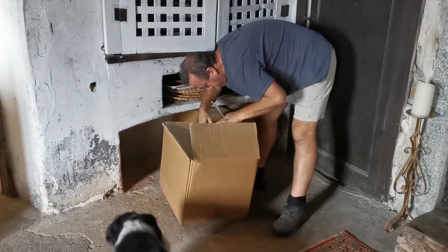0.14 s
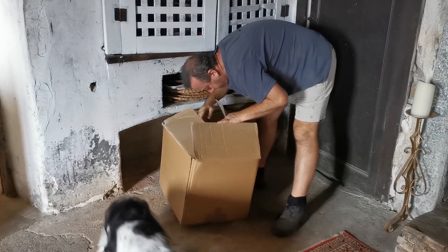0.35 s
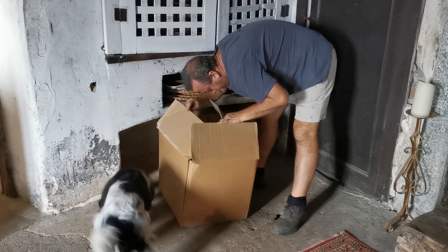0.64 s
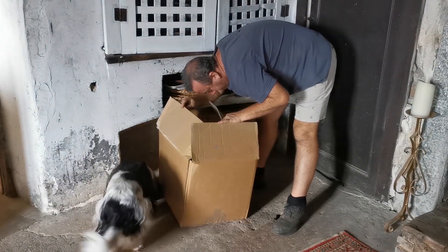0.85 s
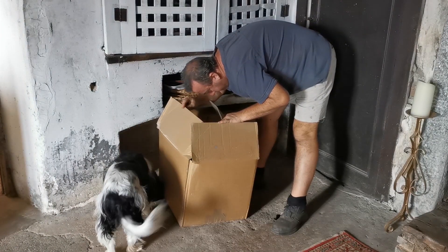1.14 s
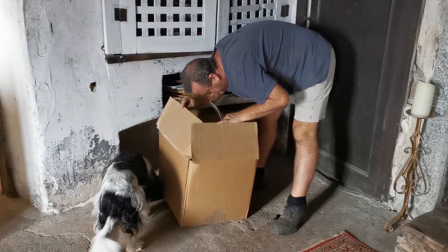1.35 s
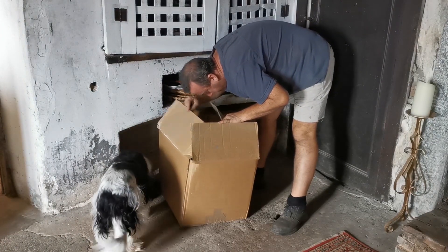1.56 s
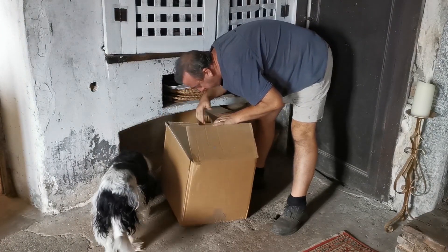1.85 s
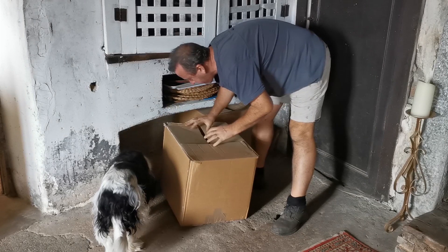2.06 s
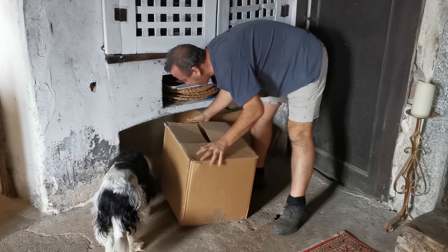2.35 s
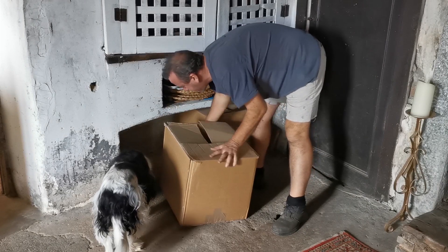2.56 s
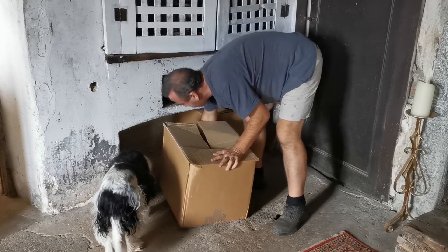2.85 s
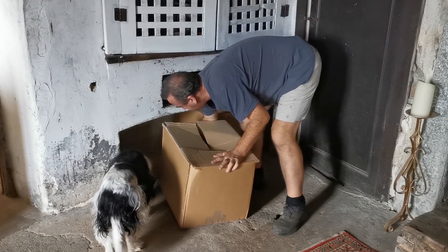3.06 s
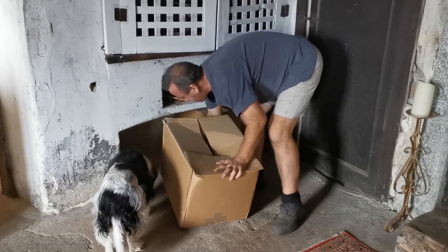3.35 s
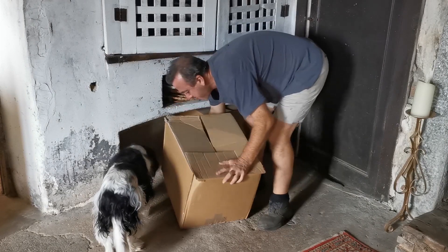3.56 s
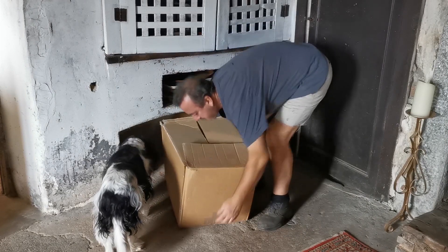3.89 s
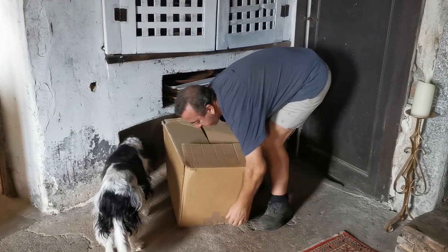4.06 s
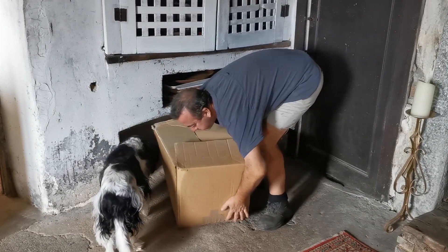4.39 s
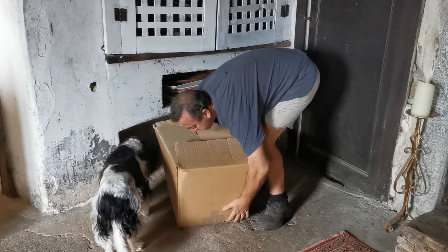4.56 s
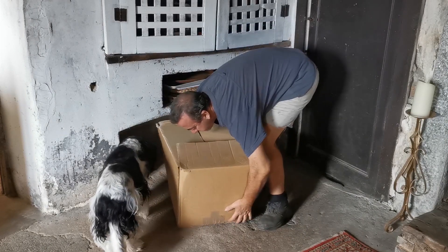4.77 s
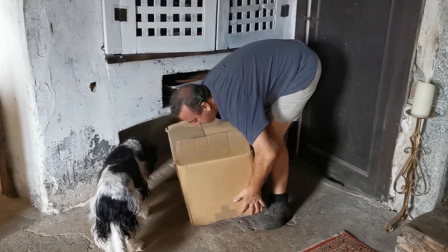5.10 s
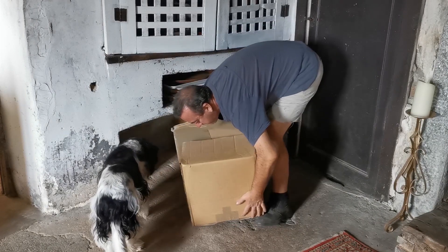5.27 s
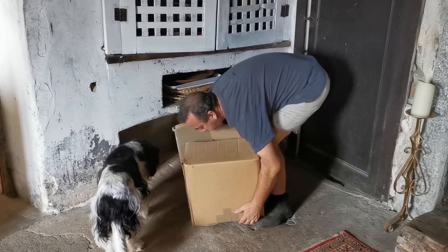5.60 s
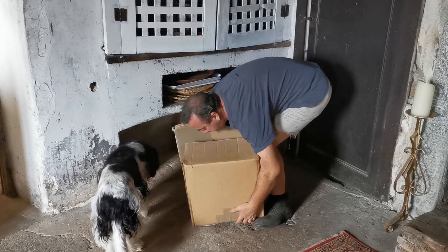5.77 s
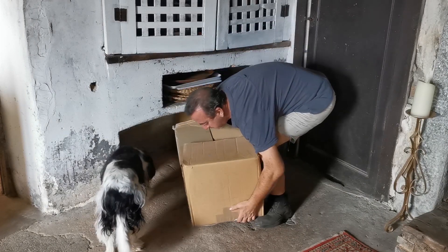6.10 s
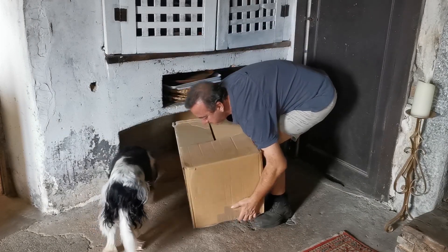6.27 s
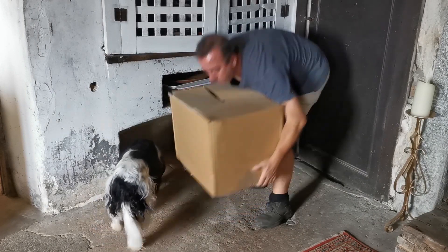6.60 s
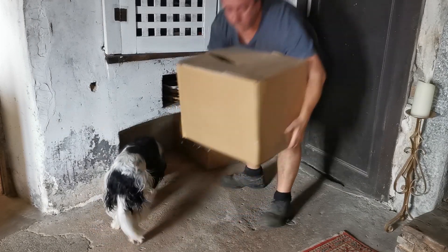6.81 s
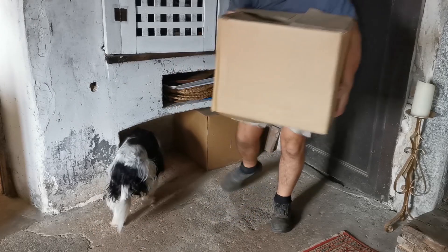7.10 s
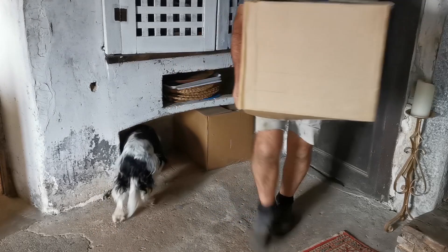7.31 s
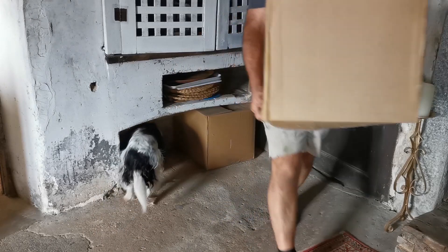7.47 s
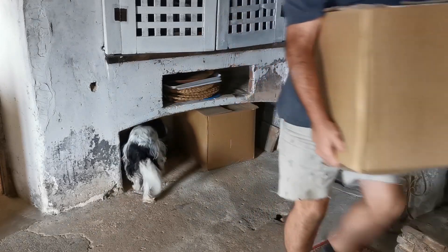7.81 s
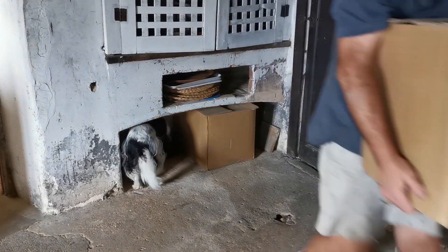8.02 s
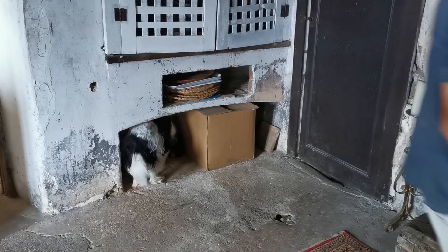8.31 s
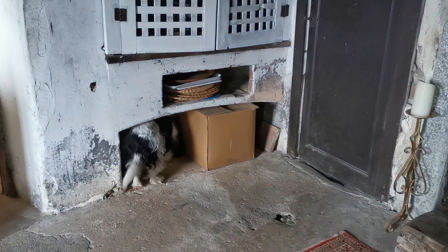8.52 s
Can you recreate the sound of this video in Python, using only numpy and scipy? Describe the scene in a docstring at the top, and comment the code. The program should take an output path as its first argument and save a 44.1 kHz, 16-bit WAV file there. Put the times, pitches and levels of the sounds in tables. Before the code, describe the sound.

Dry cardboard scraping and hollow box knocks, a loud scuffing crack midway, then softer rustles and footfalls in a reverberant stone-walled room.

```python
"""A man folds shut a large cardboard box in a small stone-walled room, drags it over the concrete, lifts it and carries it past.
Sliding card rasps in tiny random slips that shake the panels into drumming, and loose edges skid in bursts of noise.
Knocks and footfalls ring the modes of the box, creases and bumps give short cracks, the flaps pump slow swings of air.
Something small and metallic jingles early on, as brief high modes. A low rumble of shaped noise lies under it all."""
import sys
import numpy as np
from scipy import signal
from scipy.fft import rfft, irfft, next_fast_len
from scipy.io import wavfile
from scipy.ndimage import map_coordinates

SR = 44100
rng = np.random.default_rng(int(sys.argv[2]) if len(sys.argv) > 2 else 0)


def transcribe(signal):
    """Save signal, clipped to [-1, 1], as a 16-bit WAV file at the path in sys.argv[1]."""
    frames = np.atleast_2d(signal).T
    limited = np.clip(frames, -1, 1)
    pcm = np.round(limited * 32767).astype(np.int16)
    wavfile.write(sys.argv[1], SR, pcm)


N = 381460
TIME = np.arange(N) / SR
TAIL = 24576  # samples kept of every single event and of the room
CUTOFF_HZ = 15700  # top of the microphones' range

# ringing modes of the box: pitch_hz, level_db (relative), t60_s
BOX_MODES = [(74.3, -2.5, 0.2), (127, 3, 0.081), (149.4, 2, 0.13), (165, 0, 0.15), (195.3, -2, 0.15),
             (228.4, -1, 0.12), (269.2, 0, 0.097), (316, 0, 0.11), (347, 3, 0.054), (408.6, -1, 0.041),
             (538, -10, 0.11), (639, 2, 0.046), (730, -4, 0.05), (960, -16, 0.035)]


def from_db(db):
    """Decibels to gain."""
    return 10 ** (np.asarray(db) / 20)


def rms_one(x):
    """Scale to an rms of 1."""
    return x / np.sqrt(np.mean(x ** 2) + 1e-20)


def in_time(rows):
    """Columns of a curve at every sample."""
    s, *columns = np.transpose(rows)
    return [np.interp(TIME, s, column) for column in columns]


def per_bin(points, size):
    """A table over log frequency, read at every bin of a transform."""
    hz, value = np.transpose(points)
    bins_hz = np.fft.rfftfreq(size, 1 / SR) + 1
    return np.interp(np.log(bins_hz), np.log(hz), value)


def coloured(x, spectrum):
    """Filter a steady sound by a spectrum that falls away outside its ends; rms 1."""
    size = next_fast_len(N)
    below, above = (spectrum[0][0] / 2, -70), (spectrum[-1][0] * 2, -90)
    gain = from_db(per_bin([below, *spectrum, above], size))
    return rms_one(irfft(rfft(x, size) * gain, size)[..., :N])


def drift(rate):
    """Slow chance with an rms of 1: straight lines between random knots, rate of them a second."""
    knots = np.arange(0, TIME[-1] + 1, 1 / rate)
    return rms_one(np.interp(TIME, knots, rng.standard_normal(len(knots))))


def ring(force, hz, t60):
    """A damped mode: a unit click sets a sine of height 1 ringing, 60 dB down after t60 seconds."""
    decay, w = from_db(-60 / (t60 * SR)), 2 * np.pi * hz / SR
    return signal.lfilter([0, np.sin(w)], [1, -2 * decay * np.cos(w), decay * decay], force + 1e-18)


def resonance(x, hz, width_hz):
    """A band-pass with gain 1 on top."""
    return signal.lfilter(*signal.iirpeak(hz, hz / width_hz, fs=SR), x)


def band(x, hz, breadth, order):
    """Keep what lies within a factor of breadth around hz."""
    edges = [hz / breadth, min(hz * breadth, CUTOFF_HZ)]
    return signal.sosfilt(signal.butter(order, edges, "band", fs=SR, output="sos"), x)


def diffuse(size):
    """Spectrum of sound from all sides: the two microphones agree most in the bass."""
    # left-right likeness of the sound: frequency_hz, correlation (0 to 1)
    likeness = [(60, 0.75), (200, 0.88), (500, 0.66), (1000, 0.2), (4000, 0.0085)]
    mid, side = rfft(rng.standard_normal((2, size)))
    alike = np.clip(per_bin(likeness, size), 0, .999)
    return np.sqrt(1 + alike) * mid + np.sqrt(1 - alike) * side * [[1], [-1]]


def room(x, wet_db, gap=0.0017):
    """Direct sound, then dense reflections off the stone that die soonest in the treble; new at every call."""
    # decay of the stone room: frequency_hz, t60_s
    decay_times = [(120, 0.46), (4000, 0.56), (12000, 0.28)]
    t, field, tail = np.arange(TAIL) / SR, diffuse(TAIL), 0
    for hz, t60 in decay_times:
        # bands overlap: each is full at its own frequency and gone at its neighbours'
        share = per_bin([(f, f == hz) for f, _ in decay_times], TAIL)
        tail = tail + irfft(field * share) * from_db(-60 * t / t60)
    fading_in = np.minimum(t / gap, 1)  # over gap seconds
    response = from_db(wet_db) * rms_one(tail * fading_in) / np.sqrt(TAIL)
    response[:, 0] += 1  # direct sound
    return signal.fftconvolve(x[None], response, axes=1)[:, :len(x)]


def add(out, s, peak_db, sound, crest_db):
    """Lay in a sound: the rms of its first 40 ms is set crest_db below its nominal peak."""
    start, head = int(s * SR), sound[:, :SR // 25]
    gain = from_db(peak_db - crest_db) / np.sqrt(np.mean(head ** 2))
    out[:, start:start + TAIL] += gain * sound[:, :N - start]


def slips(per_s, spread_db):
    """Card catches and lets go in tiny random slips: clicks of unequal size and either sign."""
    sizes = from_db(spread_db * np.minimum(rng.exponential(1, N), 5))
    return sizes * rng.choice([-1, 1], N) * (rng.random(N) < per_s / SR)


def crack(hz, length=0.002, tearing=0.26, splinter_db=-9):
    """One sharp crack and a little tearing noise: a band of the card plus a broader, gentler one."""
    t = np.arange(TAIL) / SR
    force = signal.unit_impulse(TAIL) + tearing * rng.standard_normal(TAIL) * np.exp(-t / length)
    body = band(force, hz, breadth=1.46, order=2)
    splinter = band(force, hz, breadth=1.85, order=1)
    return body + from_db(splinter_db) * splinter


def room_rumble(level_db=-61, left_right_db=0.9):
    """Steady noise from all sides, heaviest in the bass and slightly louder on the left."""
    # colour of the rumble: frequency_hz, gain_db (relative)
    rumble_colour = [(20, 7.5), (30, -26), (50, -8.5), (90, -10.5), (200, -14), (370, -22), (1100, -33.5),
                     (7000, -47), (10500, -58), (15000, -67)]
    noise = irfft(diffuse(2 * next_fast_len(N // 2 + 1)))[:, :N]
    rumble = from_db(level_db) * coloured(noise, rumble_colour)
    return rumble * from_db([[left_right_db], [-left_right_db]])


def chinks():
    """Metal touches metal: each touch is a click that briefly rings its high modes."""
    # touches of metal: start_s, peak_db (nominal, at the box)
    touches = [(0.2194, -57), (0.517, -48), (0.7444, -37), (0.7644, -55), (1.0869, -51), (1.3512, -51)]
    # modes of the metal: pitch_hz, level_db (relative), t60_s
    metal_modes = [(5700, -1, .03), (7700, 4.5, 0.0076), (9780, -12, .06), (10740, 0, .03),
                   (10930, -4, 0.041), (14020, 2, .03), (14400, -1, .04)]
    out, touch = np.zeros((2, N)), signal.unit_impulse(TAIL)
    for s, peak_db in touches:
        metal = sum(from_db(db + rng.normal(0, 2.9)) * ring(touch, hz, t60) for hz, db, t60 in metal_modes)
        add(out, s, peak_db, room(metal + 5 * touch, wet_db=8), crest_db=15.0)
    return out


def puffs(swell=0.012):
    """The air in the box swings for a few slow cycles when a wall is pressed."""
    # air pushed out by flexing walls: start_s, peak_db (nominal, at the box), pitch_hz
    presses = [(2.275, -39, 72), (2.488, -43, 62.4), (2.721, -39, 99), (3.051, -47, 52.5),
               (3.891, -45.5, 49), (4.348, -40, 61), (5.559, -41, 62), (5.894, -41.5, 59.7),
               (6.413, -46.5, 47.4), (7.744, -51, 71), (8.459, -53.5, 40.8)]
    out, t = np.zeros((2, N)), np.arange(TAIL) / SR
    for s, peak_db, hz in presses:
        air = t * np.exp(-t / swell) * np.sin(2 * np.pi * hz * t)
        add(out, s, peak_db, room(air, wet_db=-1.0), crest_db=3.5)
    return out


def short_cracks():
    """A crease, a flap's clap, a footfall or a bump gives a single short crack in the room."""
    # short cracks: start_s, peak_db (nominal, at the box), centre_hz, room_db (reflections)
    crack_table = [(3.505, -42, 2250, -6), (3.552, -42, 7200, -10), (3.992, -37.5, 1970, -7),
                   (3.998, -34.5, 2330, 3), (4.171, -42.5, 7860, -6), (4.225, -38, 1940, 1),
                   (4.287, -43.5, 7700, 4), (5.409, -31, 2540, 4), (5.413, -24.5, 1160, -1),
                   (5.437, -31.5, 2940, 2), (6.393, -35.5, 710, 1), (6.706, -52, 2560, 3),
                   (6.816, -60, 7000, 3), (6.844, -57, 1280, -9), (7.263, -28, 880, 1),
                   (7.265, -36, 2100, 0), (7.769, -34, 815, 3)]
    out = np.zeros((2, N))
    for s, peak_db, hz, room_db in crack_table:
        add(out, s, peak_db, room(crack(hz), room_db), crest_db=16.5)
    return out


def knocks_and_footfalls(focus_db=13, scatter_db=1.56):
    """A soft blow gives a slap and rings the box, most near one panel's pitch; it rebounds once."""
    # knocks on the box and footfalls: start_s, peak_db (nominal, at the box), panel_hz, slap_db (relative to peak_db)
    blows = [(0.494, -38.5, 190, -12), (1.316, -50, 235, -4), (1.86, -41, 174, -4), (1.909, -44, 340, -19),
             (2.016, -39.5, 233, 7.5), (2.159, -42.5, 180, 8), (2.262, -27, 229, -5),
             (2.284, -23, 150.7, -12), (2.49, -44, 162, -13), (2.727, -35.5, 126.4, 3),
             (4.348, -28.5, 230, -3), (4.582, -39.5, 182, -12), (5.067, -25, 219.6, -26),
             (5.203, -33, 160, -3), (5.588, -40.5, 132, 2.5), (6.088, -32.5, 149.3, -0.5),
             (7.263, -39.5, 393, 7), (7.768, -36.5, 202, 7), (8.335, -39.5, 274, 2.5)]
    contact_s = 0.00048  # time constant of the push
    rebound_cycles, rebound_spread, rebound_db = 2.997, 0.046, -4.5  # cycles of the panel, fraction, dB
    slap_hz, slap_room_db = 570, 7.5
    out, t = np.zeros((2, N)), np.arange(TAIL) / SR
    force = np.diff(t * np.exp(-t / contact_s), prepend=0)  # what radiates is the change of a short push
    for s, peak_db, panel_hz, slap_db in blows:
        box = 0
        for k, (hz, db, t60) in enumerate(BOX_MODES):
            octaves_away = abs(np.log2(hz / panel_hz))
            strength_db = db - focus_db * octaves_away + scatter_db * rng.normal()
            # modes start in opposed pairs, so the boom swells over its first cycles
            box = box + (-1) ** (k // 2) * from_db(strength_db) * ring(force, hz, t60)
        rebound = rebound_cycles / panel_hz * (1 + rebound_spread * rng.uniform(-1.24, 1))
        for delay, loss_db in [(0, 0), (rebound, rebound_db)]:
            add(out, s + delay, peak_db + loss_db, room(box, wet_db=-2.5), crest_db=11.5)
        add(out, s, peak_db + slap_db, room(crack(slap_hz), slap_room_db), crest_db=20.5)
    return out


def scuffs(skid_s=0.044, low_hz=560, top_hz=11000, tail_db=-7, tail_t60=0.27):
    """An edge jerks free and skids: a band of dense noise starts at once, fades fast, then dies in a room tail."""
    # skids of an edge: start_s, peak_db (nominal, at the box), centre_hz
    skids = [(1.8664, -28, 8030), (1.9, -24, 7900), (2.157, -34, 1050), (2.475, -35, 1304),
             (4.201, -32, 1900), (5.4105, -14.5, 2360), (5.4219, -16.5, 2600), (6.257, -28.5, 2980),
             (7.108, -39.5, 1780), (8.346, -46, 1700), (8.45, -44, 9000)]
    out, t = np.zeros((2, N)), np.arange(TAIL) / SR
    limits = signal.butter(2, [low_hz, min(top_hz, CUTOFF_HZ)], "band", fs=SR, output="sos")
    for s, peak_db, hz in skids:
        fading = np.hypot(np.exp(-t / skid_s), from_db(tail_db - 60 * t / tail_t60))
        burst = band(irfft(diffuse(TAIL)) * fading, hz, breadth=1.18, order=1)
        add(out, s, peak_db, signal.sosfilt(limits, burst), crest_db=24.0)
    return out


def stroke_levels():
    """Each stroke takes hold, swells to a crest, slackens and dies away; overlapping strokes add in power."""
    # strokes of card sliding over card, hands or floor: start_s, rise_s (speeding up), fall_s (slowing down),
    # rasp_db (at the crest), then relative to the rasp: hiss_db (fibres), chatter_db (flaps), drumming_db (walls);
    # all levels before the trims of each layer
    strokes = [(0, 0.0033, 0.051, -51.5, -7.5, 1, -7), (.11, 0.062, 0.041, -51.5, -8, -4, -2.5),
               (.313, 0.061, 0.048, -56.5, -3.5, -0.5, -2), (.507, 0.074, 0.073, -56.5, -1.5, 2.5, 2),
               (.653, 0.1, 0.19, -51.5, -1, -6, -10), (.956, 0.08, 0.095, -58, -3, -2.5, 1),
               (1.874, 0.055, 0.039, -45.5, 1.5, -6.5, 2), (2.165, 0.015, 0.045, -59, 5, 3.5, 0),
               (2.255, 0.015, 0.051, -60.5, -2, -4, 20.5), (2.357, .02, 0.065, -59, 4.5, -4.5, 6),
               (2.48, 0.014, .14, -58, 6, -10, -13), (2.732, 0.053, 0.13, -54, 3, -2, -0.5),
               (3.001, 0.18, 0.086, -54, -2, -1, 0), (3.383, 0.13, 0.12, -51.5, -6.5, -3, -7),
               (3.735, 0.057, 0.035, -47.5, -6.5, -6, -4), (3.838, 0.049, 0.036, -48.5, 0.5, -5.5, -1),
               (3.985, 0.014, 0.061, -50.5, -4, -4, -10), (4.12, 0.12, 0.062, -51, -.5, -4, -11),
               (4.352, 0.11, 0.3, -61.5, -5.5, -3, 9.5), (4.736, 0.027, 0.39, -63, -3, -0.5, 1.5),
               (5.045, 0.023, .23, -48, -1.5, -0.5, -4), (5.192, 0.093, 0.09, -46.5, -8, 7, 9),
               (5.411, 0.032, .05, -45, -9.5, 0, 1), (5.601, 0.099, 0.3, -58, -1.5, -0.5, 2.5),
               (6.092, 0.037, 0.049, -54.5, -3, 0, -3), (6.249, 0.011, 0.053, -49.5, -5, -3, -1.5),
               (6.328, 0.083, .076, -47, -5.5, -8, -2.5), (6.52, .01, 0.17, -68.5, -2, 4, 4),
               (6.815, .01, 0.39, -71.5, -4.5, 0, -5), (7.099, 0.12, 0.27, -63.5, -10, 0, -6.5),
               (7.538, .14, 0.12, -57.5, -10.5, -3.5, -1.5), (7.718, 0.12, 0.1, -53, -7.5, 1, 0.5),
               (8.077, 0.033, 0.22, -64, -6.5, -0.5, 2), (8.28, 0.11, 0.038, -64.5, -0.5, -3, 12.5),
               (8.402, 0.017, 0.32, -66, 0, -1, -4)]
    attack_db_per_s, swell_db, slacken_db, release_db_per_s = 375, 4.5, 5, 129
    t, power = TIME[::40], 0
    for start, rise, fall, rasp_db, *others_db in strokes:
        age = t - start
        effort_db = np.interp(age, [0, rise, rise + fall], [-swell_db, 0, -slacken_db])
        effort_db -= attack_db_per_s * np.maximum(-age, 0)  # taking hold, before the start
        effort_db -= release_db_per_s * np.maximum(age - rise - fall, 0)
        power = power + np.outer(from_db([0, *others_db]), from_db(rasp_db + effort_db)) ** 2
    return [np.interp(TIME, t, np.sqrt(p)) for p in power]


def drumming(shaking, gain_db=0.0, low_hz=125, high_hz=420, sway_db=-7):
    """Coarser slips shake the walls, which answer in their low modes and sway the air in the box."""
    # colour of the swaying air: frequency_hz, gain_db (relative)
    sway_colour = [(25, -22), (45, 2), (62, 7), (85, -3.5), (120, 0)]
    force, walls = slips(per_s=900, spread_db=2.0), 0
    for k, (hz, db, t60) in enumerate(BOX_MODES):
        walls = walls + (-1) ** k * from_db(db) * ring(force, hz, t60)  # neighbours in opposite sense
    walls = signal.sosfilt(signal.butter(2, [low_hz, high_hz], "band", fs=SR, output="sos"), walls)
    panels = from_db(gain_db) * rms_one(room(walls, wet_db=-3))
    return shaking * (panels + from_db(sway_db) * coloured(force, sway_colour))


def sliding(rasp, hiss, chatter, rasp_gain_db=-1.88, hiss_gain_db=-4.0, chatter_gain_db=0.0,
            judder_db=1.14, grit_db=-11.0, count=3):
    """Dense slips at several contact spots and sparser grit excite the flaps, the face of the card and its fibres."""
    # colours of face, fibres and flaps: frequency_hz, gain_db (relative)
    rasp_colour = [(600, -32), (1100, -8.5), (1350, -3.5), (1800, 2.5), (2700, 1.3), (3700, -2.5),
                   (4900, -1.5), (6000, -11.5), (9000, -25.5)]
    hiss_colour = [(2500, -17), (4800, -3.5), (6200, -2), (8000, -2), (9000, -5), (10800, -3), (12300, -4),
                   (15000, -10), (16000, -26)]
    chatter_colour = [(200, 0.5), (360, 1.5), (480, -1), (580, 0), (800, -1.5), (1000, -4), (1250, -2.5),
                      (1750, -20), (3500, -59)]
    # resonances of the loose flaps: centre_hz, width_hz, gain_db
    flap_resonances = [(666, 400, -7), (677, 12, -12), (936, 100, -2.5), (930, 21, -19), (1100, 20, -12)]
    spots = sum(room(slips(per_s=2000, spread_db=2.5), wet_db=8.0) for _ in range(count))
    grit = room(slips(per_s=70, spread_db=0.0), wet_db=-4.5)
    judder = from_db(judder_db * drift(rate=55))
    friction = (rms_one(spots) + from_db(grit_db) * rms_one(grit)) * judder
    flaps = friction + sum(from_db(db) * resonance(friction, hz, width_hz) for hz, width_hz, db in flap_resonances)
    return (rasp * from_db(rasp_gain_db) * coloured(friction, rasp_colour)
            + hiss * from_db(hiss_gain_db) * coloured(friction, hiss_colour)
            + chatter * from_db(chatter_gain_db) * coloured(flaps, chatter_colour))


def placed(x):
    """Level and arrival time at the two microphones follow the box."""
    # where the box is: time_s, pan_db (left minus right), lag_samples (of the left)
    path = [(0, 1.5, -2.5), (1.4, 2.5, -1.5), (2, 0.9, -0.5), (3.4, 1.1, 1), (4.2, 0.2, -1.5),
            (4.9, 4.5, 0), (5.3, 4, 2), (6.2, 4, -2.5), (7.3, 4.5, 3), (7.8, 4, 6), (8.65, 3, 10.5)]
    pan_db, lag = in_time(path)
    left = map_coordinates(x[0], [np.arange(N) - lag], order=3)
    return np.array([left, x[1]]) * from_db(np.array([pan_db, -pan_db]) / 2)


def scene():
    """The box, the footfalls and the metal, all heard from where the box is, over the rumble of the room."""
    rumble = room_rumble()
    rasp, hiss, chatter, shaking = stroke_levels()
    events = chinks() + puffs() + short_cracks() + knocks_and_footfalls() + scuffs()
    box = events + drumming(shaking) + sliding(rasp, hiss, chatter)
    return placed(box) + rumble


def port(x, resonances):
    """A microphone port lifts or hollows the treble around each of its resonances."""
    return x + sum((from_db(db) - 1) * resonance(x, hz, width_hz) for hz, width_hz, db in resonances)


def record(dry):
    """Each microphone port has its own colour; a steep low-pass cuts the top."""
    # resonances of the microphone ports: centre_hz, width_hz, gain_db
    left_port = [(10330, 1590, 10.5), (7700, 2500, -4)]
    right_port = [(7900, 950, 8.5), (10500, 1900, 0)]
    ports = [port(dry[0], left_port), port(dry[1], right_port)]
    return signal.sosfilt(signal.ellip(10, .1, 70, CUTOFF_HZ, fs=SR, output="sos"), ports)


dry = scene()
out = record(dry)
transcribe(out)
```